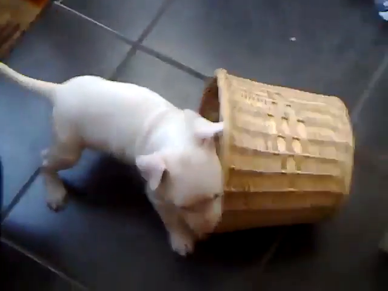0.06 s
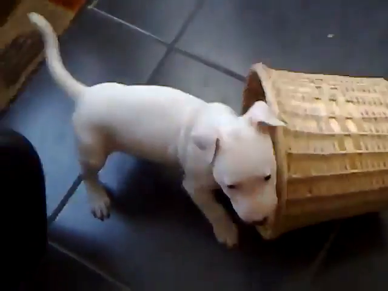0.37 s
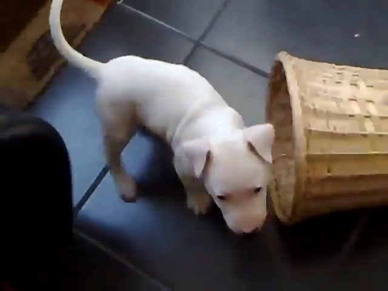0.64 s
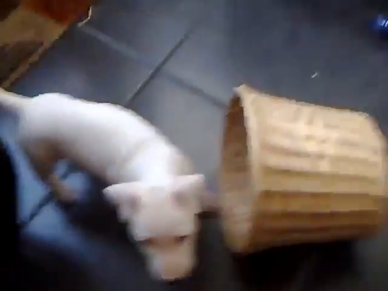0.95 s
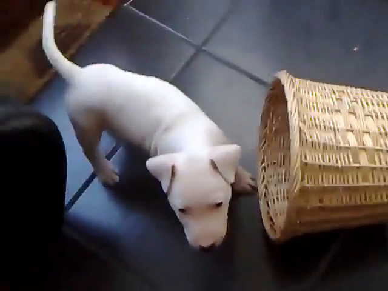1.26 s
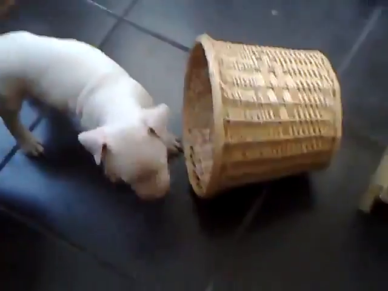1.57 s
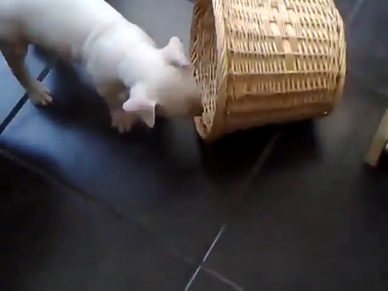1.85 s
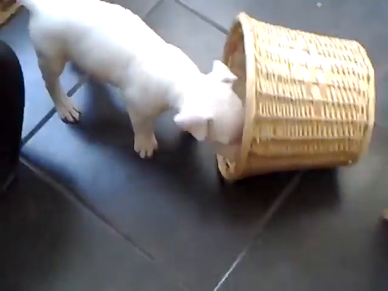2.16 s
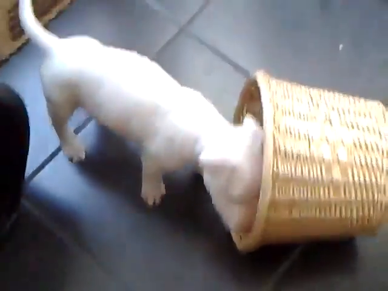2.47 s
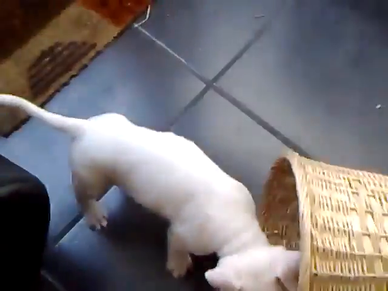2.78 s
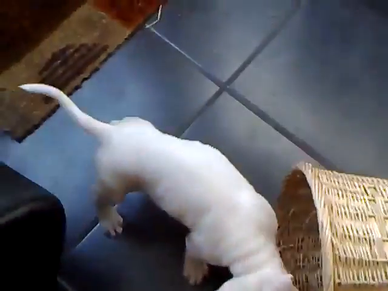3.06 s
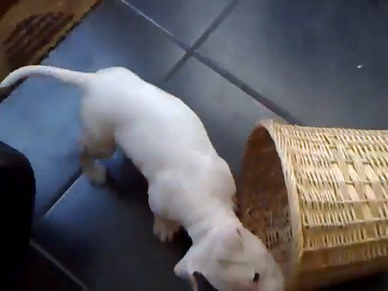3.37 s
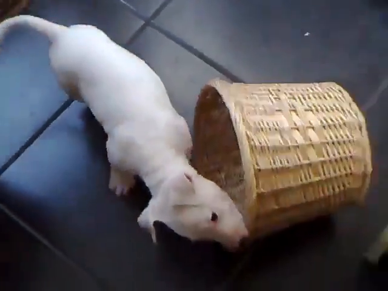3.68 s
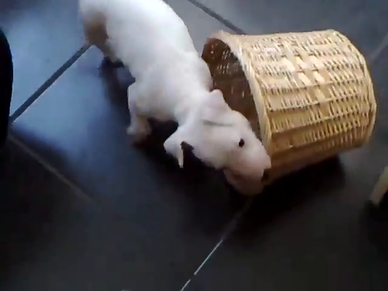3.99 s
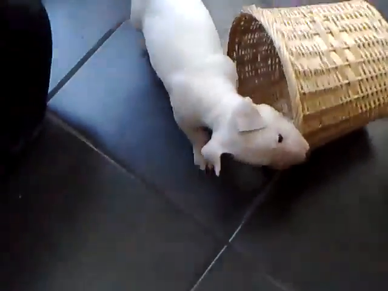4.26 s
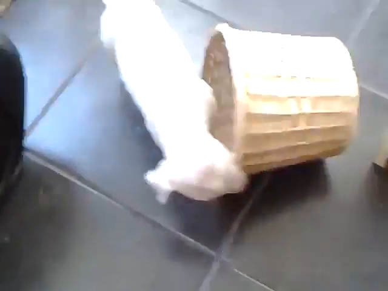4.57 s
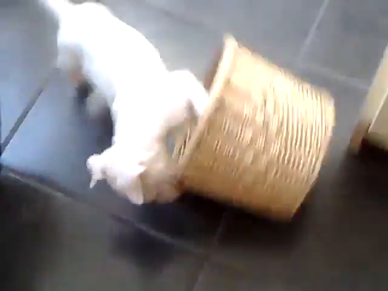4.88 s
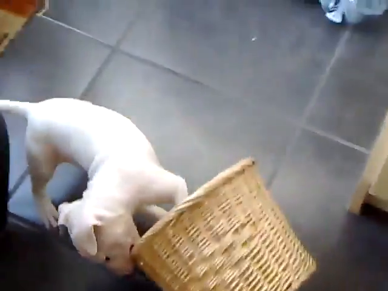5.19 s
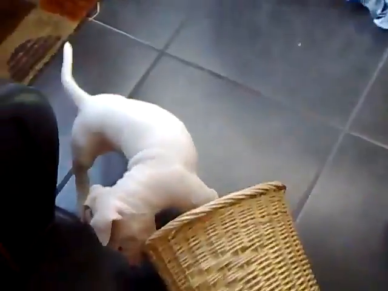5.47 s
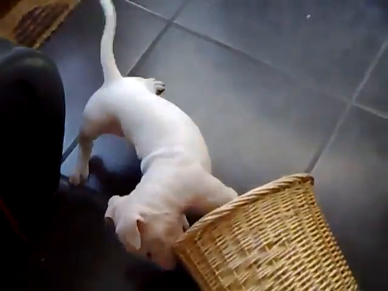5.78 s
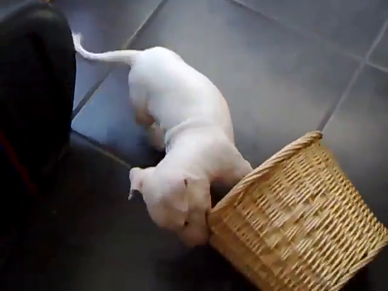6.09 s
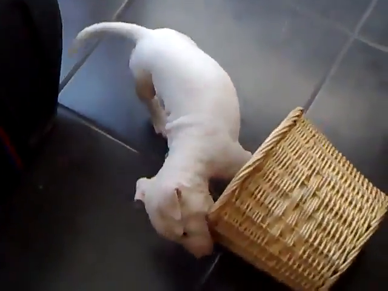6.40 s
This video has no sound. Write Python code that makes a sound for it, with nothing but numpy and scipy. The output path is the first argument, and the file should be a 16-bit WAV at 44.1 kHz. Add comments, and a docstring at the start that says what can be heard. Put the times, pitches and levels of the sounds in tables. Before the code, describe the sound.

Scattered hollow knocks, creaks and rustling drags of a wicker basket pushed over tiles indoors, with one loud clatter midway.

```python
"""A puppy and a wastebasket

A puppy shoves a wicker wastebasket, lying on its side, over a tiled floor in a small hard room.
The basket rings as it knocks on the tiles, creaks as its canes slip, rustles as it drags, and once
clatters down loudly. A camera's gain control then ducks the room and its hiss and slowly lets them back."""
import sys
import numpy as np
from scipy import signal
from scipy.fft import rfft, irfft
from scipy.io import wavfile
from scipy.ndimage import uniform_filter1d, minimum_filter1d

SR = 44100
rng = np.random.default_rng(int(sys.argv[2]) if len(sys.argv) > 2 else 0)


def to_wav(s):
    """Save 16-bit WAV."""
    ch = np.atleast_2d(s).T  # columns
    pcm = np.round(np.clip(ch, -1, 1) * 32767)  # PCM
    wavfile.write(sys.argv[1], SR, pcm.astype(np.int16))


N = 292824
T = np.arange(32768) / SR  # time axis of one short sound [s]
HZ = np.fft.rfftfreq(32768, 1 / SR)  # its frequency axis


# how the basket's three parts ring: (pitch [Hz], half width [Hz], level [dB])
BELLY_RING = [(168, 37, -14.5), (310, 110, -1), (560, 100, -1), (708, 200, 6.5)]
RIM_RING = [(1032, 310, 0)]
CANE_RING = [(1774, 230, -2), (2240, 300, 3), (2750, 367, -4)]

def blow(levels_db, pitches, room_db, contact_hz=7040):
    """One hit rings belly, rim and canes; the spot that is struck shifts their pitch."""
    *ring_db, snap_db = levels_db
    parts = zip((BELLY_RING, RIM_RING, CANE_RING), ring_db, pitches)
    rings = [amp(db) * unit(peaks(modes, HZ / pitch)) for modes, db, pitch in parts]
    # wicker gives way, so little rings far above contact_hz
    ring = np.linalg.norm(rings, axis=0) / np.sqrt(1 + (HZ / contact_hz) ** 4)
    snap = amp(snap_db) * crack(snap_db - ring_db[-1])
    return burst(causal(np.hypot(ring, snap)) * weave() * room(room_db))


# the crack of a single cane: (frequency [Hz], level [dB])
CRACK_SHAPE = [(300, -19.5), (2500, -17), (4500, 1), (6200, -7.5), (8200, -0.5), (10500, -9), (15500, -8.5)]

def crack(hardness_db):
    """A harder crack means a shorter contact, so its treble reaches higher."""
    corner_hz = 26000 * amp(0.61 * hardness_db)
    return unit(amp(read(CRACK_SHAPE, HZ)) / np.sqrt(1 + (HZ / corner_hz) ** 4))


# knocks on the tiles: (time [s], belly [dB], rim [dB], canes [dB], snap [dB], belly pitch [ratio],
# rim pitch [ratio], cane pitch [ratio], rebound delay [s], rebound compared with the first hit [dB])
TILE_KNOCKS = [ (0.002, -33.5, -35, -27, -53, 0.81, 1.43, 0.98, .034, -4.5),
               (0.274, -46.5, -52.5, -55, -73, 0.57, 0.87, 1.3, 0.02, -4),
               (0.6453, -34.5, -33, -23, -63, 0.65, 1.1, 1.083, .023, -9),
               (1.157, -36.5, -32, -35.5, -74, 0.87, 1.02, 1.01, .014, -9),
               (1.7511, -42, -37.5, -34.5, -79, 0.9, 1.05, 0.96, .016, -10),
               (1.838, -47, -53, -55.5, -70, 0.8, 1.4, 1.15, .015, -3.5),
               (2.0641, -38.5, -34.5, -35.5, -74, 1.48, 0.93, 1.066, .02, -22),
               (2.139, -45, -55, -56, -71, 0.74, 1.3, 0.71, 0.014, -8),
               (2.832, -32.5, -42, -29.5, -65, 0.85, 1.0, 1, .009, -5),
               (4.5593, -43, -42.5, -44, -66.5, 0.65, 1.3, 1.09, 0.022, -4),
               (5.127, -48.5, -54.5, -55.5, -82, 1.09, 1.44, 1.03, .015, -7),
               (5.5838, -72, -66, -49.5, -58.5, 1.4, 0.86, 1.3, 0.029, -14),
               (5.911, -39.5, -34.5, -34, -37, 0.91, 1.65, 1.04, .006, -7),
               (6.195, -55, -55.5, -56.5, -68, 0.95, 1.66, 1.35, 0.0092, -7),
               (6.242, -54.5, -49, -75, -68, 0.77, 1.71, 0.54, .012, -6),
               (6.412, -47.5, -60, -64, -72, 0.92, 1.2, 0.93, .011, 0.5), ]

def knocks():
    """Each knock is a hit and its rebound, as the other end of the basket lands."""
    out = np.zeros(N)
    for s, *levels_db, belly_pitch, rim_pitch, cane_pitch, rebound_s, rebound_db in TILE_KNOCKS:
        pitches = (belly_pitch, rim_pitch, cane_pitch)
        for delay, db in [(0, 0), (rebound_s, rebound_db)]:
            add(out, s + delay, amp(db) * blow(levels_db, pitches, room_db=3.3))
    return out


def clatter(start_s=2.8503, peak_s=2.868, ribs=9, gap_s=0.0066, rise_db_per_s=600, fall_db_per_s=331.5):
    """The basket drops and rib after rib hits the tiles, swelling and dying away."""
    peak_db = (-7.5, -17.5, 4.0, -31)  # belly, rim, canes, snap
    usual_pitch, spread = np.array([0.97, 0.79, 1.0]), (0.11, 0.2, 0.02)  # belly, rim, canes
    out = np.zeros(N)
    for s in start_s + gap_s * np.arange(ribs):
        below_peak_db = max(rise_db_per_s * (peak_s - s), fall_db_per_s * (s - peak_s))
        pitches = usual_pitch * np.exp(rng.uniform(-1, 1, size=3) * spread)
        add(out, s, amp(-below_peak_db) * blow(peak_db, pitches, room_db=8))
    return out


# how a bent cane rings: (pitch [Hz], half width [Hz], level [dB])
SQUEAK_RING = [(1700, 370, -7.5), (2490, 450, 0.5), (2920, 530, -11)]
# creaks of the wicker: (time [s], level [dB], length [s], snap compared with the ring [dB])
WICKER_CREAKS = [ (0.206, -44, 0.018, -27), (0.316, -42, 0.019, -18), (0.377, -41, 0.01, -17),
                 (0.436, -40.5, 0.015, -17), (2.653, -53.5, 0.0037, -28), (3.507, -42, 0.0068, -15),
                 (3.546, -60, .012, -10), (3.913, -46, 0.032, -14), (4.081, -42, 0.014, -22),
                 (4.347, -58, 0.0031, -10), (4.443, -56.5, 0.014, -9), (4.948, -59, .04, -8),
                 (5.401, -52.5, 0.01, -9.5), (5.498, -55.5, 0.007, -8.5), (5.614, -51, 0.027, -13),
                 (5.701, -54.5, 0.02, -10), ]

def creaks(sharp_s=0.0072):
    """A cane lets go and a short run of slips follows."""
    out = np.zeros(N)
    for s, db, length, snap_db in WICKER_CREAKS:
        swell = np.sqrt(T / length) * np.exp(-(T / length) ** 2)
        run = slips(len(T), per_s=1200, spread_db=3.0) * swell
        run[0] = sharp_s / length  # short creaks start with a jolt
        pitch = np.exp(0.092 * rng.uniform(-1.013, 1))  # each cane has its own pitch
        ring = unit(peaks(SQUEAK_RING, HZ / pitch))
        colour = causal(np.hypot(ring, amp(snap_db) * crack(snap_db)))
        add(out, s, burst(amp(db) * unit(rfft(run) * colour * weave() * room(room_db=2.5))))
    return out


# the puppy's shoves: (time [s], length [s], cane rustle [dB], low drag [dB])
PUPPY_SHOVES = [ (0.0, 0.11, -37, -54), (1.27, 0.063, -56, -51.5), (1.38, 0.33, -84, -59),
                (2.246, 0.085, -60.5, -78), (4.156, 0.24, -61.5, -63), (4.448, 0.066, -54, -74),
                (4.759, 0.039, -53, -65), (4.897, 0.11, -51, -74), (5.11, 0.19, -56, -50),
                (5.295, 0.25, -54, -54), (5.525, 0.19, -53, -53.5), (5.843, 0.22, -48, -53),
                (6.28, 0.31, -51.5, -60), ]

def shoving(attack_s=0.039, release_s=0.1, nudge_db=(-65, -59)):
    """How loud rustle and drag are: each shove builds, holds and fades, over constant nudging."""
    t = np.arange(N) / SR
    power = amp(nudge_db)[:, None] ** 2
    for s, length, *levels_db in PUPPY_SHOVES:
        build = np.clip((t - s) / attack_s, 0, 1)
        fade = np.exp(-np.maximum(t - s - length, 0) / release_s)
        power = power + (amp(levels_db)[:, None] * build * fade) ** 2
    return np.sqrt(power)


# slipping canes, and the rim rubbing on tile: (frequency [Hz], level [dB])
RUSTLE_SHAPE = [(200, -29), (1100, -13), (1700, -2.5), (2400, 1.5), (3000, -5), (3800, -8), (5000, -13),
                (6500, -27.5), (8500, -20.5), (15000, -38)]
DRAG_SHAPE = [(100, -4.5), (330, -4), (520, 1), (720, -1.5), (1000, -6), (1500, -15.5), (3000, -33)]

def slide(spots=3):
    """Wicker catches on tile: uneven, crackly slips rustle the canes; more even ones make the rim drone."""
    rustle, drag = shoving()
    crackly = slips(N, per_s=320, spread_db=4.2)
    even = slips(N, per_s=300, spread_db=3.0)
    canes = np.hypot(amp(read(RUSTLE_SHAPE, HZ)), amp(-3.5) * peaks(SQUEAK_RING, HZ))
    rim = amp(read(DRAG_SHAPE, HZ))
    out = np.zeros(N)
    for level, colour, catches in [(rustle, canes, crackly), (drag, rim, even)]:
        # each spot touching the floor has its own path through basket and room
        spot = rng.integers(0, spots, N)
        paths = [burst(causal(colour) * weave() * room(room_db=4.0)) for _ in range(spots)]
        rub = sum(signal.oaconvolve(catches * (spot == k), path)[:N] for k, path in enumerate(paths))
        out += unit(rub) * level
    return out


def slips(samples, per_s, spread_db):
    """Sticking and slipping makes random clicks, mostly small, a few large."""
    size = amp(spread_db * np.minimum(rng.exponential(1, samples), 4))
    return size * rng.choice([-1., 1.], samples) * (rng.random(samples) < per_s / SR)


def weave():
    """Waves cross the wicker by many routes, the low ones slowest, smearing a hit over a few ms."""
    routes = unit(smooth(rng.standard_normal(len(HZ)), 250))
    delay_s = .0013 * (1000 / (HZ + 200)) ** .4 * np.exp(.55 * routes)
    return np.exp(-2j * np.pi * np.cumsum(delay_s) * HZ[1])


# low thuds: (peak time [s], level [dB], pitch [Hz])
LOW_THUDS = [(0.659, -41, 170), (2.87, -18, 158), (2.873, -28.5, 58), (5.512, -49, 50), (5.61, -58, 55)]

def thuds(rise_s=.014):
    """A low tone swells and quickly dies under the heavier hits and shoves."""
    out = np.zeros(N)
    for s, db, hz in LOW_THUDS:
        thud = T * np.exp(-T / rise_s) * np.sin(2 * np.pi * hz * T)
        add(out, s - rise_s, burst(amp(db) * unit(rfft(thud))))
    return out


# small dry ticks: (time [s], level [dB])
NEAR_TICKS = [(0.89, -57), (0.877, -59)]
# how a tick rings: (pitch [Hz], half width [Hz], level [dB])
TICK_TONES = [(1170, 190, 5), (3680, 190, 0)]

def ticks():
    """Tiny clicks with a short ring, too near to stir the room."""
    out = np.zeros(N)
    for s, db in NEAR_TICKS:
        add(out, s, burst(amp(db) * unit(causal(peaks(TICK_TONES, HZ)))))
    return out


# how long echoes last: (frequency [Hz], time to fade by 60 dB [s])
ECHO_TIMES = [(100, 0.61), (250, 0.18), (600, 0.43), (1400, .39), (2500, 0.38), (4000, 0.37), (7000, 0.17),
              (14000, 0.13)]
# standing waves, the notes the room favours: (pitch [Hz], half width [Hz], level [dB])
ROOM_NOTES = [(167, 8, 5), (341, 5, 10), (603, 5, 0), (692, 15, -5)]

def room(room_db, onset_s=0.0012, early_db=6.0, early_s=.02, echoes_per_s=4000):
    """Spectrum of the path from the floor: direct sound, then dense echoes turned up by room_db."""
    taps = rng.choice([-1., 1.], len(T)) * (rng.random(len(T)) < echoes_per_s / SR)
    hz, t, bands = signal.stft(taps, SR, nperseg=256)
    # nearby floor and furniture make the first echoes stronger
    fade_db = early_db * np.exp(-t / early_s) - 60 * t / read(ECHO_TIMES, hz)[:, None]
    echoes = rfft(signal.istft(bands * amp(fade_db), SR, nperseg=256)[1][:len(T)])
    # the many paths share the energy evenly over wide bands
    echoes = echoes / np.sqrt(smooth(abs(echoes) ** 2, 200))
    tail = irfft(echoes) * np.clip(T / onset_s - .5, 0, 1) * (T < T[-1] / 2)
    echoes = unit(rfft(tail)) * causal(1 + peaks(ROOM_NOTES, HZ))
    return (1 + amp(room_db) * echoes) / np.sqrt(1 + amp(room_db) ** 2)


# room rumble and microphone hiss: (frequency [Hz], relative level [dB])
AIR_SHAPE = [(15, -31.5), (25, -2.5), (64, -2), (96, -0.5), (126, -6), (352, -9.5), (461, -15),
             (654, -20.5), (1590, -23), (1930, -16), (2660, -32), (2970, -21), (6310, -29.5), (14600, -26),
             (15800, -27.5)]

def room_tone(start_db=-55.5, growth_db=4.5, hum_hz=100, hum_db=-61):
    """Rumble and hiss grow slightly, over a faint mains hum."""
    t = np.arange(N) / SR
    air = amp(start_db + growth_db * t / t[-1]) * noise(AIR_SHAPE)
    return air + amp(hum_db) * unit(np.sin(2 * np.pi * hum_hz * t))


def amp(db):
    """Turns decibels into a gain."""
    return 10 ** (np.asarray(db) / 20)


def unit(x):
    """Scales to an average (rms) level of 1."""
    return x / np.sqrt(np.mean(np.abs(x) ** 2) + 1e-20)


def smooth(x, size):
    """Takes a moving average twice."""
    return uniform_filter1d(uniform_filter1d(x, size), size)


def read(points, hz):
    """Joins (frequency, value) points on a log-frequency axis."""
    f, value = np.transpose(points)
    return np.interp(np.log(hz + 1), np.log(f + 1), value)


def add(mix, s, sound):
    """Mixes a sound in at time s."""
    part = mix[max(round(s * SR), 0):][:len(sound)]
    part += sound[:len(part)]


def peaks(modes, hz):
    """Gain curve with a peak at each ringing pitch."""
    return np.sqrt(sum((amp(db) / (1 + ((hz - f) / width) ** 2)) ** 2 for f, width, db in modes))


def causal(gain):
    """Turns a gain curve into a spectrum that starts sharply, then rings (minimum phase)."""
    log_gain = np.log(np.maximum(gain, gain.max() * 1e-5))
    mirrored = np.concatenate([log_gain, log_gain[-2:0:-1]])
    return np.exp(np.conj(signal.hilbert(mirrored)))[:len(gain)]


def noise(shape):
    """Noise with the given spectrum, at level 1."""
    gain = amp(read(shape, np.fft.rfftfreq(N, 1 / SR)))
    return unit(irfft(rfft(rng.standard_normal(N)) * gain, N))


def burst(spectrum):
    """Turns a spectrum of level 1 into a sound with the energy of 0.1 s at level 1."""
    return irfft(spectrum)[:len(T) * 3 // 4] * np.sqrt(SR / 10)


def scene():
    """The basket and the room at one microphone."""
    return (knocks() + clatter() + creaks() + ticks() + slide() + thuds() + room_tone())[None]


def gain_control(x, limit_db=-8.0, hold_s=0.48, recover_db_per_s=22.0, start_cut_db=15.0):
    """Loud sound turns the gain down at once; it holds, then climbs back. It starts turned down."""
    level_db = 10 * np.log10(abs(uniform_filter1d(x ** 2, size=500)) + 1e-12)
    over_db = np.maximum(level_db - limit_db, 0)
    over_db[0] = start_cut_db
    size = round(hold_s * SR)
    held_db = -minimum_filter1d(-over_db, size, mode="nearest", origin=(size - 1) // 2)
    climb_db = recover_db_per_s * np.arange(N) / SR
    cut_db = np.maximum.accumulate(held_db + climb_db) - climb_db
    return x / amp(uniform_filter1d(cut_db, size=200))


# faint steady low rumble that remains while the hiss is ducked: (frequency [Hz], relative level [dB])
RUMBLE_SHAPE = [(24, -35.5), (40, -2), (106, -7.5), (242, -7.5), (289, -8.5), (420, -15.5), (710, -18),
                (1980, -25.5), (6260, -35), (15800, -41.5)]

def record(dry, rumble_db=-63, ceiling=.84, top_hz=15950):
    """Gain control, a faint steady rumble, soft squashing of the clatter, then a cut of the top treble."""
    x = gain_control(dry[0]) + amp(rumble_db) * noise(RUMBLE_SHAPE)
    x = x / (1 + (x / ceiling) ** 4) ** (1 / 4)
    lowpass = signal.firwin(511, top_hz, window=("kaiser", 9), fs=SR)
    return signal.oaconvolve(x, lowpass, "same")[None]


dry = scene()
out = record(dry)
to_wav(out)
```